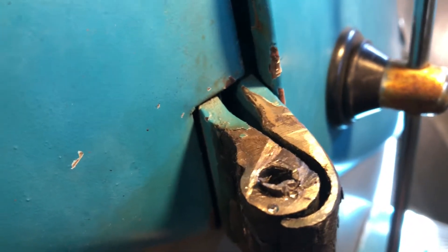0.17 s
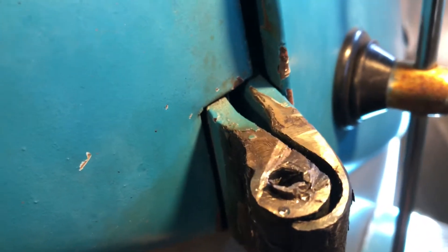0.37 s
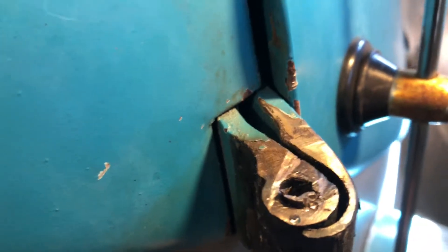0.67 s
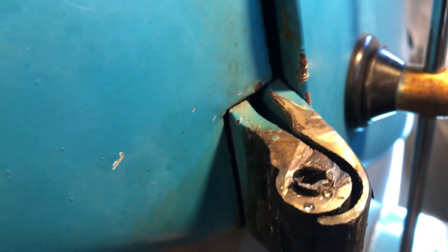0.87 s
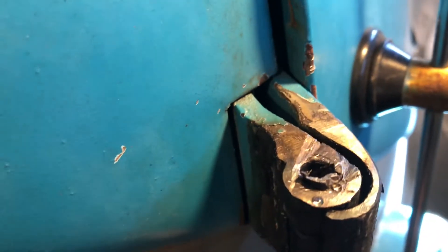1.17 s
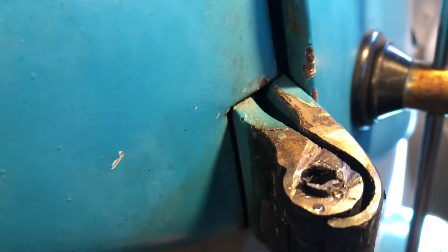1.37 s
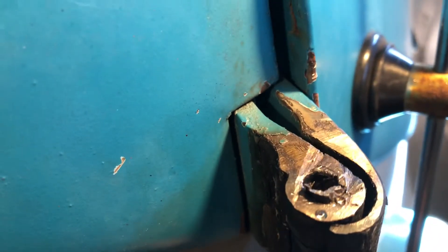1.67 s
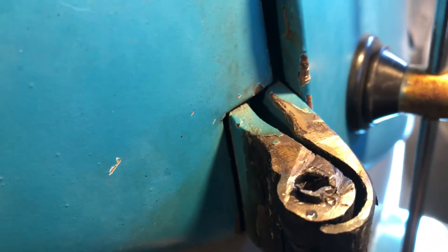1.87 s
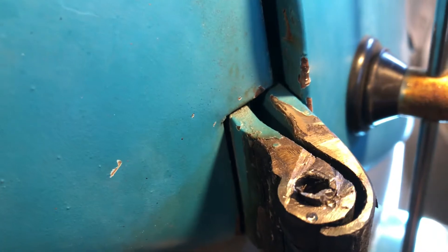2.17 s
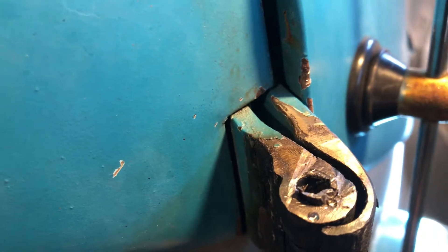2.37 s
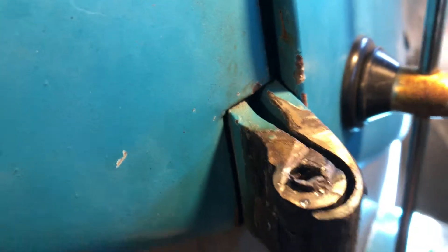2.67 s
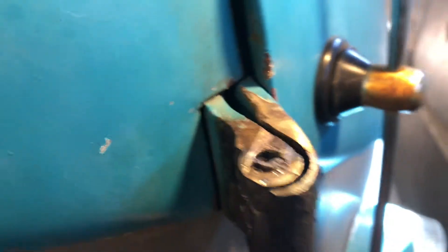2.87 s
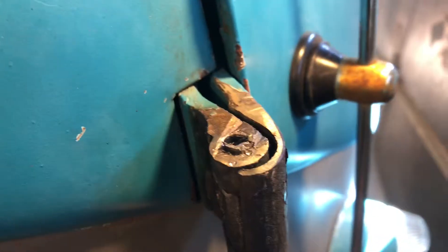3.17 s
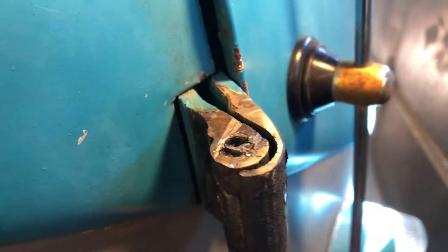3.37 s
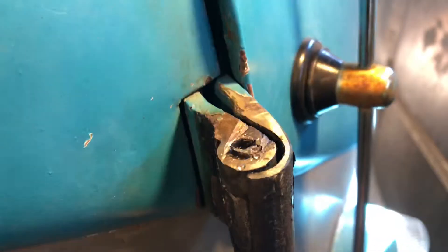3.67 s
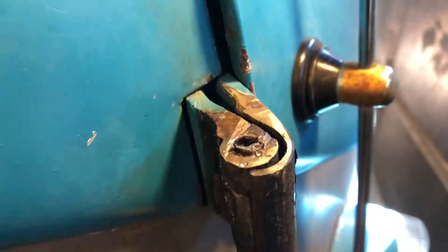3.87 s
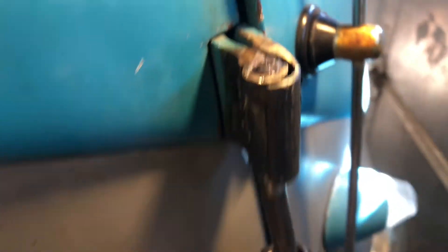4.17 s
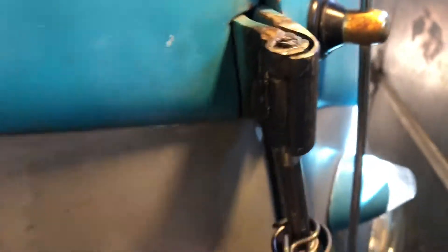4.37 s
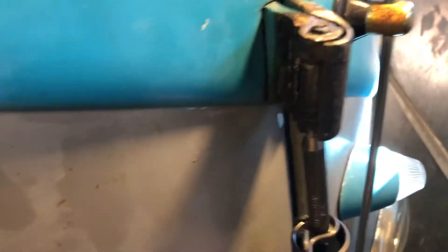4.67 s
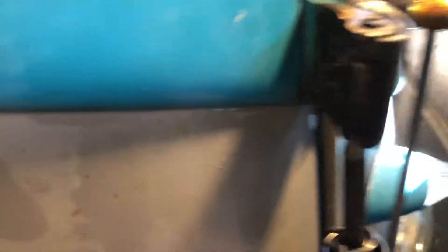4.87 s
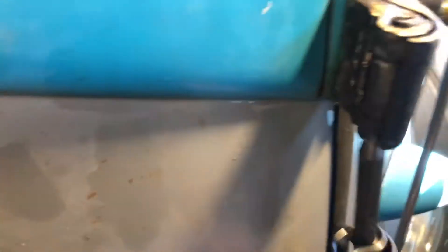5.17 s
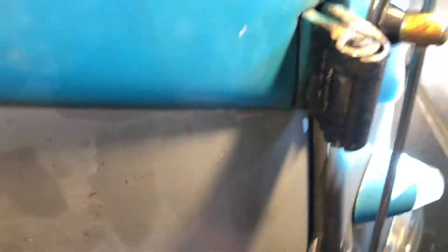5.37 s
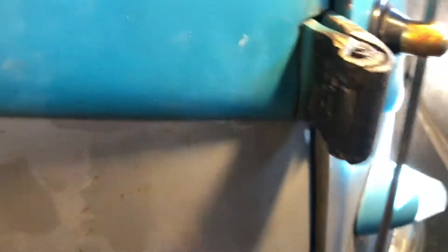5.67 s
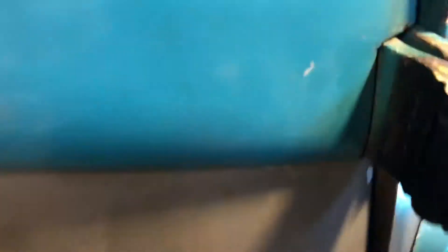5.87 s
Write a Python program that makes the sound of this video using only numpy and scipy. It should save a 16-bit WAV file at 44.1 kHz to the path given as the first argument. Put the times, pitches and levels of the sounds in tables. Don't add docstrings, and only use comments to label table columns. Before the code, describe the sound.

Harsh, rapid pneumatic hammering on ringing metal, briefly interrupted, then cut off to a low humming compressor, light scuffs and a clunk.

```python
import sys
import numpy as np
from scipy import signal
from scipy.fft import rfft, irfft
from scipy.io import wavfile

SR = 44100
rng = np.random.default_rng(int(sys.argv[2]) if len(sys.argv) > 2 else 0)


def amplitude_ratio(level_db):
    exponent = np.asarray(level_db, float) / 20
    return 10 ** exponent


def unload_audio(sound):
    columns = np.transpose(np.atleast_2d(sound))
    steps = np.round(np.clip(columns, -1, 1) * 32767)
    wavfile.write(sys.argv[1], SR, steps.astype(np.int16))


N = 265437

# first stroke in seconds, release in seconds.
BURSTS = [
    (.0125, .51),
    (.9366, 3.86),
]
# time in seconds, ms to next stroke.
PACE = [(0.012, 24.544), (0.4, 23.884), (0.448, 24.732), (0.473, 27.605), (0.937, 20.315), (0.957, 21.954),
        (1.142, 24.757), (1.603, 23.755), (1.722, 23.902), (1.985, 23.85), (2.445, 24.572), (2.469, 24.452),
        (3.25, 24.305), (3.47, 24.72), (3.595, 25.52), (3.772, 25.029), (3.824, 29.325)]
STROKE_DB, LAST_DB = -11, -1.5
FRESH_DB, FRESH_S = 0.5, 0.1

# ms after the port opens, level in dB.
PUFF = [(0, -20), (1.3, 0), (4.2, -8), (6.7, -17), (13.5, -18), (15.5, -12), (16.7, -13), (18.7, -22),
        (24, -26)]
# frequency in Hz, level in dB per Hz.
JET = [(60, -31), (400, -12), (800, -5), (1400, -3), (3500, -4.5), (5500, -6), (9000, -3.5), (16000, 0)]
JET_DB, JET_ON_DOOR_DB = -12, -40
# time in seconds, level in dB.
LEAD_HISS = [(.912, -62), (.926, -42), (.936, -32), (.94, -69.5)]

# frequency in Hz, level in dB per Hz.
BUFFET = [(40, 6.5), (70, -3), (140, 1), (300, -4), (600, -7), (1500, -45)]
BUFFET_DB = -30.5
# frequency in Hz, level in dB per Hz.
GUST = [(100, -26), (220, -3), (500, -0.5), (800, -5), (1200, -20.5)]
GUST_MS, GUST_WIDE_MS, GUST_DB = 4.91, 2.26, -22.5

# frequency in Hz, level in dB, t60 in seconds, polarity.
DOOR = [(384, -41.2, 0.045, 1), (720, -25.7, 0.045, 1), (882, -29.0, 0.13, 1), (982, -28.4, 0.078, -1),
        (1046, -24.0, 0.068, -1), (1104, -23.4, 0.048, 1), (1165, -20.6, 0.08, 1), (1183, -21.9, 0.12, -1),
        (1218, -18.7, 0.045, 1), (1260, -23.6, 0.2, 1), (1337, -19.5, 0.08, -1), (1407, -16.7, 0.08, -1),
        (1477, -32.5, 0.195, 1), (1505, -21.8, 0.078, -1), (1589, -29.2, 0.078, 1), (1750, -34.0, 0.12, -1),
        (1894, -17.9, 0.018, 1), (1927, -27.8, 0.072, -1), (2192, -11.8, 0.009, 1),
        (2375, -18.9, 0.027, -1), (2555, -27.5, 0.08, -1), (2650, -22.4, 0.029, 1),
        (3010, -21.3, 0.038, -1), (3261, -12.6, 0.007, -1), (3440, -24.9, 0.027, 1),
        (4390, -20.4, 0.007, 1), (4747, -21.4, 0.027, -1), (5118, -17.5, 0.004, 1), (5752, -19.4, 0.016, 1),
        (6253, -14.4, 0.004, -1)]
# frequency in Hz, level in dB per Hz.
PANEL = [(300, -30), (500, -18), (3300, -18), (5500, -12), (7000, 0), (8200, -3), (10000, -12),
         (16000, -14)]
PANEL_DB, PANEL_T60_S = -18.5, .025
# frequency in Hz, level in dB, t60 in seconds, dB gained as it seats, polarity.
SHANK = [(4760, -38, 0.02, -8, -1), (5087, -50, 0.3, 5, 1), (5800, -38, 0.018, 15, 1),
         (6800, -24, 0.01, -5, 1), (2990, -25, .018, -10, -1)]
BLOW_LAG_S, BLOW_JITTER_S = .0022, .00005
BLOW_DB, BLOW_SCATTER_DB = 10.8, -1

# ms after the port opens, level in dB, frequency in Hz,
# t60 in seconds, polarity.
POPS = [
    (0.64, -15.5, 920, 0.0029, 1),
    (15.8, -26.5, 490, 0.044, 1),
    (20, -17, 1870, 0.0046, -0.73),
    (19, -22, 2390, 0.0087, 0.84),
]

# delay in ms, level in dB.
REFLECTIONS = [(7.1, -16.6), (8.68, -12.4), (13.56, -16), (14.1, -13.7), (16.08, -14)]
WALL_DULL_HZ = 4500
# frequency in Hz, t60 in seconds.
GARAGE = [(100, 1), (700, 0.5), (2000, 0.49), (5000, 0.44), (8000, 0.11), (13000, 0.12)]
DOOR_ECHO_DB, AIR_ECHO_DB, KNOCK_ECHO_DB, FLOOR_DB = -22, -14.5, -15, -70.5

# frequency in Hz, level in dB, t60 in seconds.
HANDLE = [(800, 3.5, 0.04), (1250, -1, .04)]
SPRING = [(5770, 5, .012), (14500, 0, .004), (13000, 5, .004), (10400, -10, .008)]
CATCH = [(7850, -7, .015), (3500, -4, .004), (2500, -6, .004)]
SILL = [(122, 0, .2)]
BARREL = [(836, -8, .03), (1090, -7, .025), (1270, -4, .025), (1440, 0, .035), (1580, -2, .025),
          (1710, -2, .03), (2000, -8, .012), (2350, -7, .022), (2800, -11, .012), (3350, -7, .02),
          (5070, -20, .005)]
HOSE = [(233, -3.5, 0.067), (645, 0, 0.026), (1100, -3, .02), (1600, 0, .02), (3300, -10, .012),
        (9100, -24, .08)]
CLIP = [(9800, -2, .05), (7750, -4, .015)]
COLLAR = [(7650, -6, .05), (4500, -3, .005), (4100, -2, .006), (3700, -6, .006)]
# time in seconds, level in dB, body.
TAPS = [
    (.686, -44, HANDLE),
    (4.611, -45, SPRING),
    (4.618, -41, CATCH),
    (5.1, -50, SILL),
    (5.3236, -23, BARREL),
    (5.332, -31, HOSE),
    (5.514, -43, CLIP),
    (5.522, -32, COLLAR),
]

# time in seconds, turns in Hz.
PISTON = [(5.25, 57.79), (5.6, 57.7), (6.02, 57.83)]
# multiple of the piston rate, level in dB.
ORDER_DB = [(1, -9), (2, -26), (3, -16), (4, -22), (5, -22), (6, -7), (7, -7), (8, -10), (9, -7), (10, 0),
            (11, -22), (12, -20), (13, -17), (14, -20), (15, -18), (16, -25), (17, -13), (18, -14),
            (19, -17), (20, -21), (21, -32), (22, -24), (23, -11), (24, -24), (25, -22), (26, -17),
            (27, -19), (28, -23), (29, -25), (30, -21)]
# frequency in Hz, level in dB per Hz.
CLATTER = [(24, -40), (40, -7), (75, -11.5), (109, -42.5), (171, -3), (283, -26), (337, -6), (570, -9),
           (646, -11), (1340, -12), (2700, -21), (3380, -18), (16000, -33.5)]
# time in seconds, gain in dB.
RECOVERY = [(4.02, 0.5), (5.25, 8.5), (5.55, 10.5), (5.98, 13.5)]
CUT_IN_S, THUMP_DB, CLATTER_DB = 2.5, -41.5, -55
BASS_BACK_S, BASS_CUT_DB = 4.23, -2
TOP_ORDER, UPPER_DB, UPPER_SLOPE_DB, HEAD_ORDER, HEAD_DB = 62, -24.5, -.6, 58, 9

# start in seconds, end in seconds, level in dB,
# frequency in Hz, width in Hz.
SCUFFS = [
    (4.95, 5.25, -50, 1880, 120),
    (5.86, 6.04, -49, 3100, 400),
    (5.88, 6.05, -48, 2100, 500),
    (4.8, 5.45, -68, 9200, 200),
    (4.6, 5.9, -58, 6500, 2000),
]


def rms_one(x):
    return x / np.sqrt(np.mean(x ** 2) + 1e-20)


def at_hz(points, hz):
    table_hz, values = np.transpose(points)
    return np.interp(np.log(np.maximum(hz, 1)), np.log(table_hz), values)


def noise(spectrum):
    colour = amplitude_ratio(at_hz(spectrum, np.fft.rfftfreq(N, 1 / SR)))
    return rms_one(irfft(rfft(rng.standard_normal(N)) * colour, N))


def drift(rate):
    knots = rng.standard_normal(400)
    return np.interp(np.arange(N) / SR * rate, np.arange(400), knots)


def clicks(seconds, gains):
    out = np.full(N, 1e-18)
    np.add.at(out, np.round(np.asarray(seconds) * SR).astype(int), gains)
    return out


def ring(push, hz, t60):
    radius, w = amplitude_ratio(-60 / (t60 * SR)), 2 * np.pi * hz / SR
    return signal.lfilter([0, np.sin(w)], [1, -2 * radius * np.cos(w), radius * radius], push)


def strokes():
    rows = []
    for start, release in BURSTS:
        s = start
        while s < release:
            step = np.interp(s, *np.transpose(PACE)) / 1000
            fresh = np.exp(-(s - start) / FRESH_S) * (start > BURSTS[0][0])
            last = s + step > release
            rows.append((s, STROKE_DB + FRESH_DB * fresh + LAST_DB * last))
            s += step
    return rows


def exhaust():
    t = np.arange(N) / SR
    opens, strength_db = np.transpose(strokes())
    opens = opens - .0007
    stroke = np.maximum(np.searchsorted(opens, t) - 1, 0)
    since_ms = 1000 * (t - opens[stroke]) + 24 * (t < opens[0])
    last = np.diff(opens, append=99)[stroke] > .1
    shut_db = -2.5 * last * np.maximum(since_ms - 8.0, 0)
    uneven_db = 0.93 * rng.standard_normal(len(opens))
    puff_db = np.interp(since_ms, *np.transpose(PUFF))
    shape_db = puff_db + (strength_db + 15.5 + uneven_db)[stroke] + shut_db
    hiss_db = np.interp(t, *np.transpose(LEAD_HISS), left=-99, right=-99)
    return noise(JET) * (amplitude_ratio(JET_DB + shape_db) + amplitude_ratio(hiss_db))


def buffeting():
    t, opens = np.arange(N) / SR, np.transpose(strokes())[0]
    since = t - opens[np.maximum(np.searchsorted(opens, t) - 1, 0)]
    gust_shape = np.exp(-((1000 * since - GUST_MS) / GUST_WIDE_MS) ** 2)
    gust = noise(GUST) * amplitude_ratio(GUST_DB) * gust_shape
    wind_db = BUFFET_DB + 2.0 * drift(40) - 960 * np.abs(since)
    return noise(BUFFET) * amplitude_ratio(wind_db) + gust


def door(air):
    earlier = (BURSTS[0][0] - .0244, STROKE_DB)
    opens, strength_db = np.transpose([earlier] + strokes())
    luck = rng.standard_normal((len(opens), len(DOOR)))
    hits = np.maximum(opens + BLOW_LAG_S + BLOW_JITTER_S * luck[:, 1], 0)
    gains = amplitude_ratio(strength_db + BLOW_DB + BLOW_SCATTER_DB * luck[:, 0])
    t = np.arange(SR // 10) / SR
    dense = noise(PANEL)[:len(t)] * amplitude_ratio(PANEL_DB - 60 * t / PANEL_T60_S)
    out = signal.fftconvolve(clicks(hits, gains), dense)[:N]
    for (hz, level_db, t60, polarity), own in zip(DOOR, luck.T):
        push = clicks(hits, gains * amplitude_ratio(.4 * own)) + amplitude_ratio(JET_ON_DOOR_DB) * air
        out += polarity * amplitude_ratio(level_db) * ring(push, hz, t60)
    for hz, level_db, t60, seat_db, polarity in SHANK:
        shank_db = level_db + np.interp(hits, [2.9, 3.4], [0, seat_db])
        out += polarity * ring(clicks(hits, gains * amplitude_ratio(shank_db)), hz, t60)
    return signal.sosfilt(signal.butter(2, 200, "high", fs=SR, output="sos"), out)


def ports():
    opens, strength_db = np.transpose(strokes())
    whole = np.diff(opens, append=99) < .1
    out = 0
    for ms, db, hz, t60, polarity in POPS:
        sounds = whole | (ms < BLOW_LAG_S * 1000)
        push = clicks(opens + ms / 1000, amplitude_ratio(db + strength_db - STROKE_DB) * sounds)
        out = out + polarity * ring(push, hz, t60)
    return out


def reflected(x):
    ms, db = np.transpose(REFLECTIONS)
    back = signal.fftconvolve(x, clicks(ms / 1000, amplitude_ratio(db))[:SR // 20])[:N]
    return x - signal.sosfiltfilt(signal.butter(2, WALL_DULL_HZ, fs=SR, output="sos"), back)


def garage(x):
    t, echo = np.arange(SR) / SR, 0
    for low in 60 * 2 ** np.arange(0, 8.1, .5):
        band = signal.butter(2, [low, low * np.sqrt(2)], "band", fs=SR, output="sos")
        echo = echo + signal.sosfilt(band, rng.standard_normal(SR)) * amplitude_ratio(-60 * t / at_hz(GARAGE, low))
    echo = echo * np.clip((t - .004) / 0.015, 0, 1)
    return signal.fftconvolve(x, echo / np.sqrt(np.sum(echo ** 2)))[:N]


def knocks():
    out, bounce = 0, np.array([0, 1, 1, 1])
    for (s, db, body), luck in zip(TAPS, rng.random((len(TAPS), 26))):
        times = s + .004 * luck[:4] * bounce
        contacts = clicks(times, amplitude_ratio(db - (7.0 + 8.0 * luck[4:8]) * bounce))
        for (hz, level_db, t60), side in zip(body, np.sign(luck[8:] - .5)):
            crack = amplitude_ratio(-1) * ring(contacts, hz, 4.8 / hz)
            out = out + side * amplitude_ratio(level_db) * (ring(contacts, hz, t60) + crack)
    return out


def compressor():
    t = np.arange(N) / SR
    turn = 2 * np.pi * np.cumsum(np.interp(t, *np.transpose(PISTON))) / SR
    upper = np.arange(len(ORDER_DB) + 2.5, TOP_ORDER + 1)
    head_db = HEAD_DB * np.exp(-((upper - HEAD_ORDER) / 3.8) ** 2)
    upper_db = UPPER_DB + UPPER_SLOPE_DB * (upper - upper[0]) + head_db
    upper_db = upper_db + 1.24 * rng.standard_normal(len(upper))
    thump = 0
    for k, db in list(ORDER_DB) + list(zip(upper, upper_db)):
        level_db = db + 0.34 * drift(13.0) + BASS_CUT_DB * (k == 1) * (t < BASS_BACK_S)
        phase = (2.3 + k / 12) * rng.standard_normal() + 0.05 * drift(7.7)
        thump = thump + amplitude_ratio(level_db) * np.cos(k * turn + phase)
    clatter = noise(CLATTER) * amplitude_ratio(1.0 * np.cos(turn) + .7 * drift(22))
    mix = rms_one(thump) * amplitude_ratio(THUMP_DB) + clatter * amplitude_ratio(CLATTER_DB)
    cut_in = np.clip((t - CUT_IN_S) / 0.18, 0, 1)
    return mix * amplitude_ratio(np.interp(t, *np.transpose(RECOVERY))) * cut_in


def scuffs():
    t, out = np.arange(N) / SR, 0
    for start, end, db, hz, width in SCUFFS:
        swell = np.sin(np.pi * np.clip((t - start) / (end - start), 0, 1))
        out = out + amplitude_ratio(db) * swell * rms_one(ring(rng.standard_normal(N), hz, 2.4 / width))
    return out


def scene():
    air, taps = exhaust(), knocks() + scuffs()
    steel = reflected(door(air)) + ports()
    echo = garage(amplitude_ratio(DOOR_ECHO_DB) * steel + amplitude_ratio(AIR_ECHO_DB) * air + amplitude_ratio(KNOCK_ECHO_DB) * taps)
    floor = amplitude_ratio(FLOOR_DB) * noise([(40, -43.5), (200, 7.0), (600, 22), (3000, -6.5), (16000, -26)])
    return (steel + air + taps + echo + buffeting() + compressor() + floor)[None]


def low_pass(x):
    return signal.sosfilt(signal.butter(12, 16650, fs=SR, output="sos"), x)


def record(dry):
    thin = signal.sosfilt(signal.butter(3, 45, "high", fs=SR, output="sos"), dry)
    rounded = 1.265 * np.tanh(thin / 0.94)
    top_cut = signal.ellip(10, .5, 70, 15780, fs=SR, output="sos")
    return low_pass(signal.sosfilt(top_cut, rounded))


dry = scene()
out = record(dry)
unload_audio(out)
```